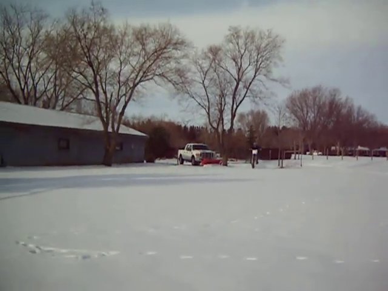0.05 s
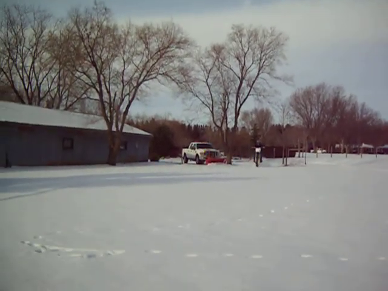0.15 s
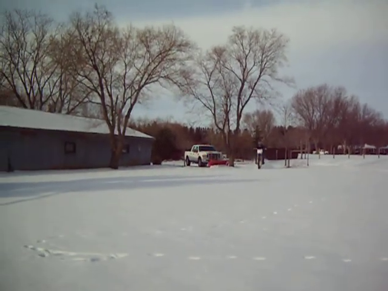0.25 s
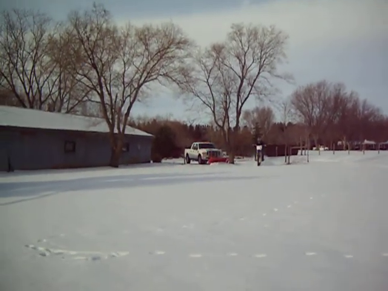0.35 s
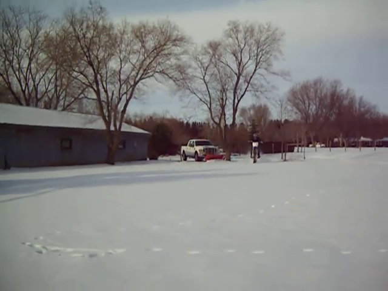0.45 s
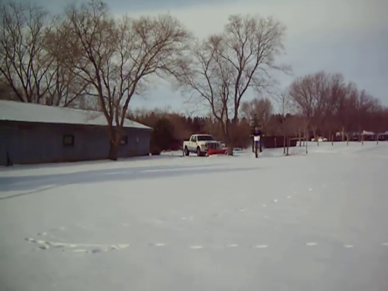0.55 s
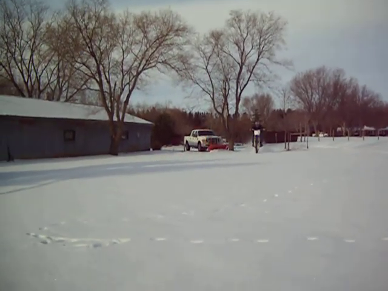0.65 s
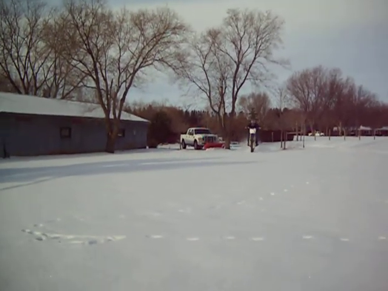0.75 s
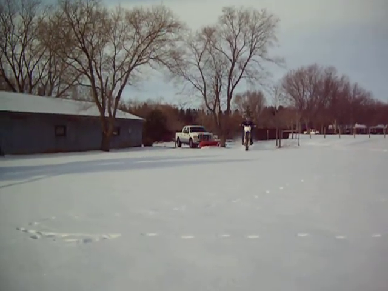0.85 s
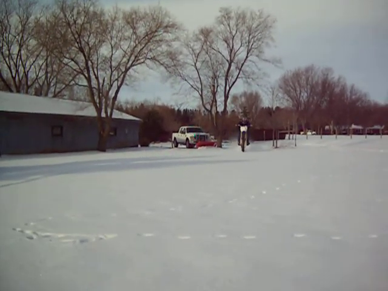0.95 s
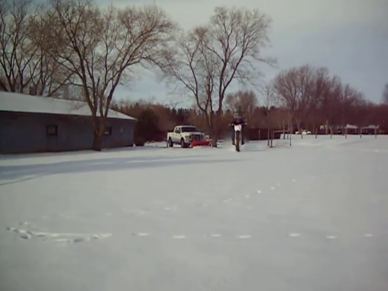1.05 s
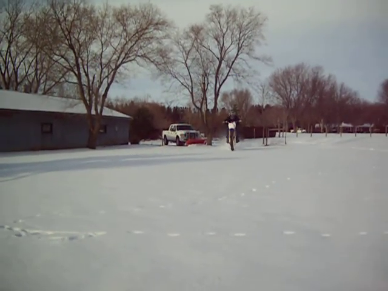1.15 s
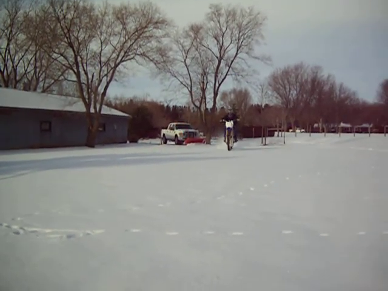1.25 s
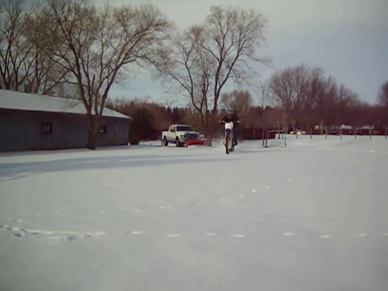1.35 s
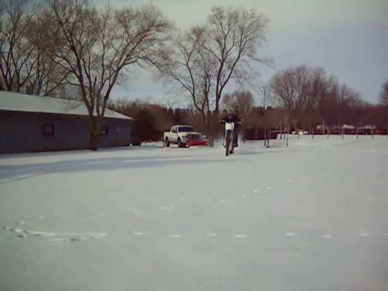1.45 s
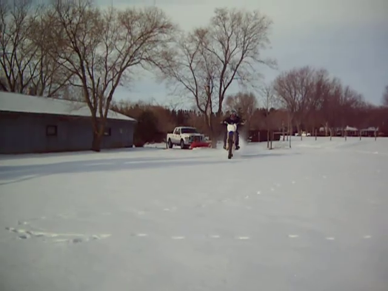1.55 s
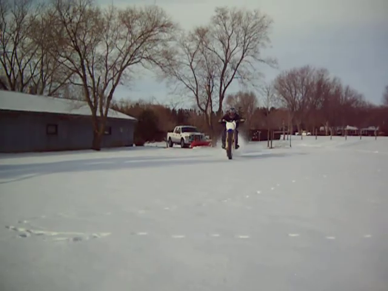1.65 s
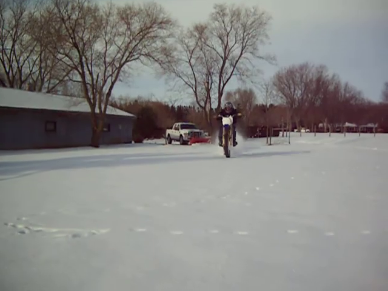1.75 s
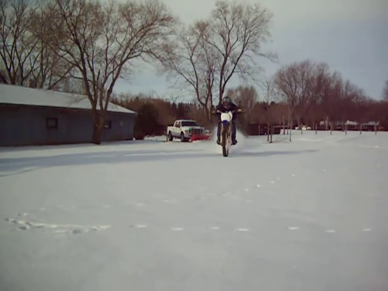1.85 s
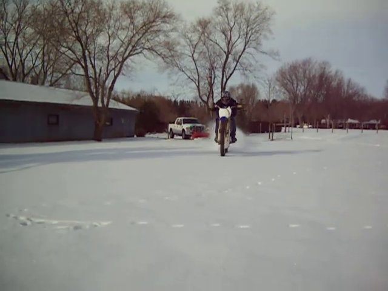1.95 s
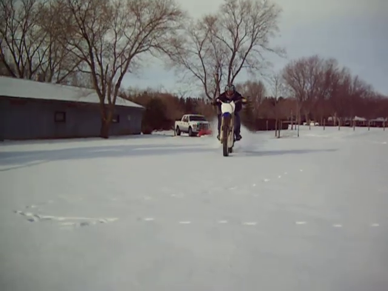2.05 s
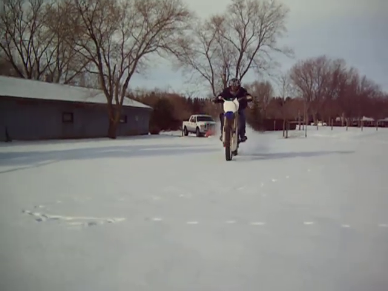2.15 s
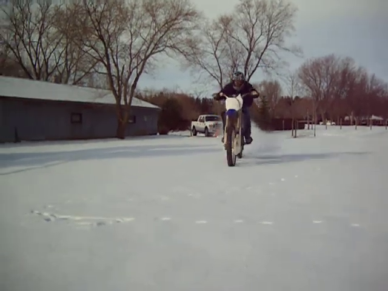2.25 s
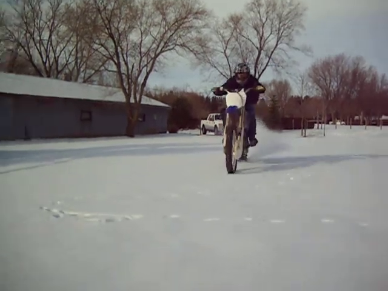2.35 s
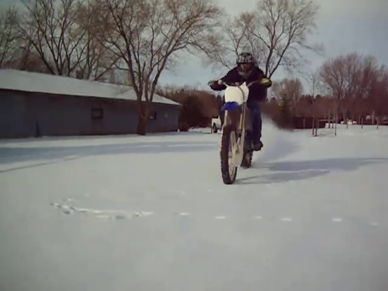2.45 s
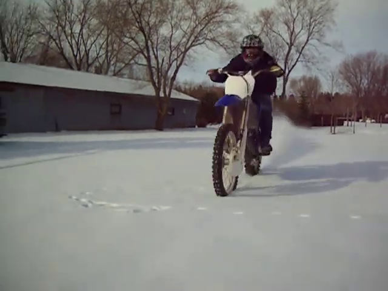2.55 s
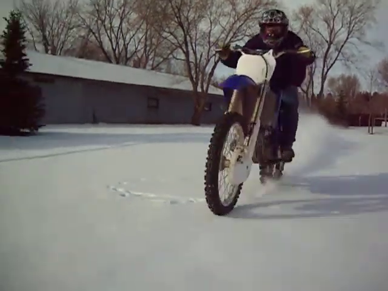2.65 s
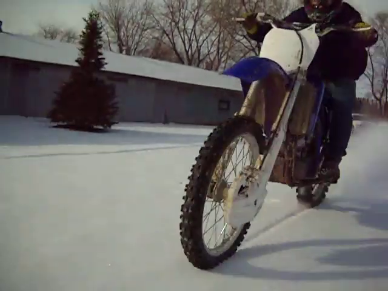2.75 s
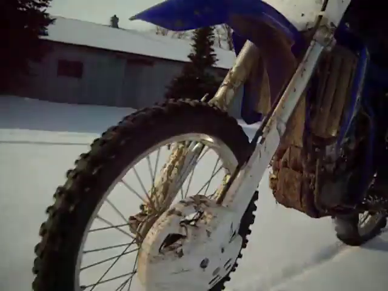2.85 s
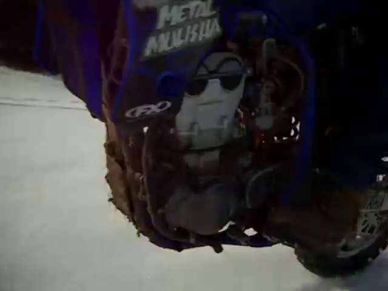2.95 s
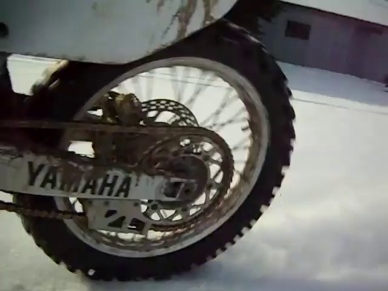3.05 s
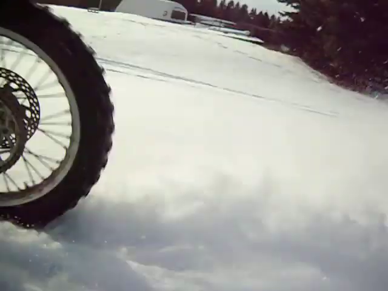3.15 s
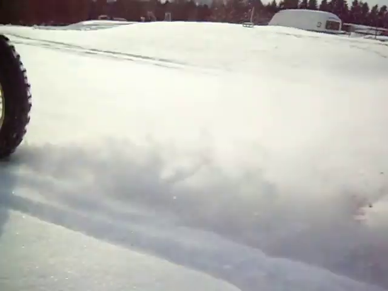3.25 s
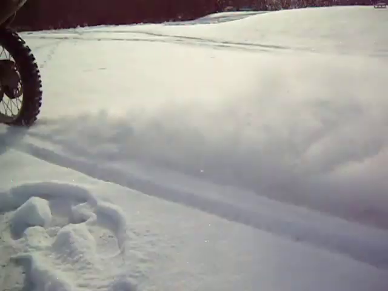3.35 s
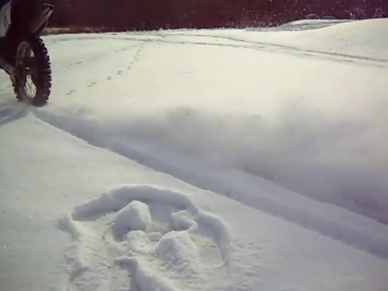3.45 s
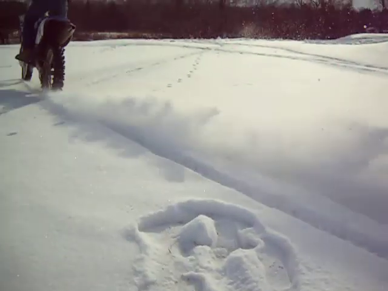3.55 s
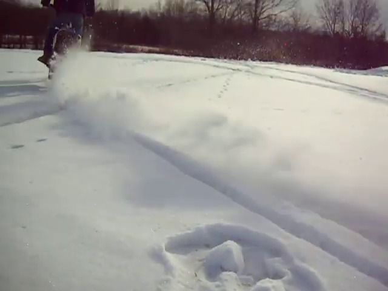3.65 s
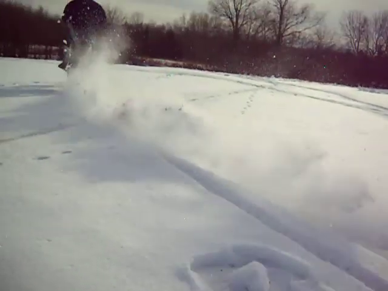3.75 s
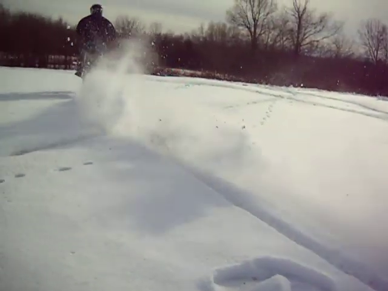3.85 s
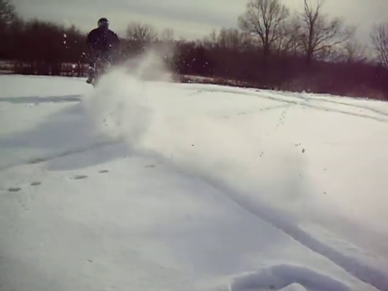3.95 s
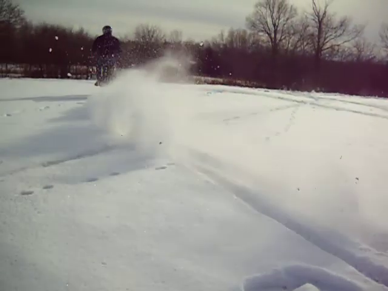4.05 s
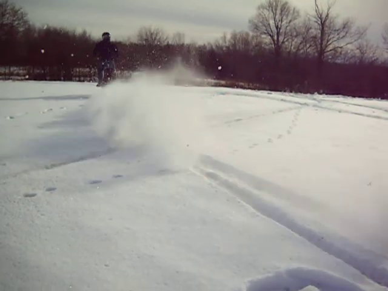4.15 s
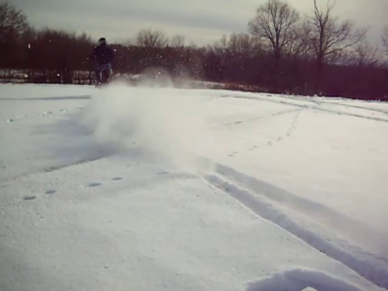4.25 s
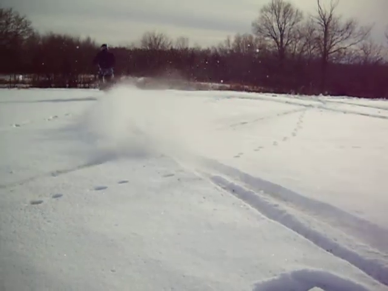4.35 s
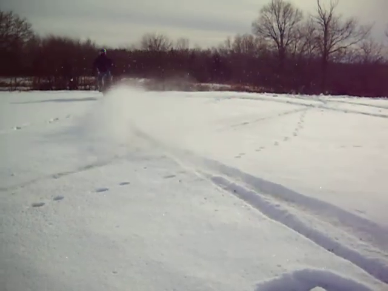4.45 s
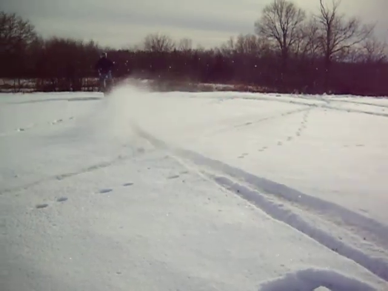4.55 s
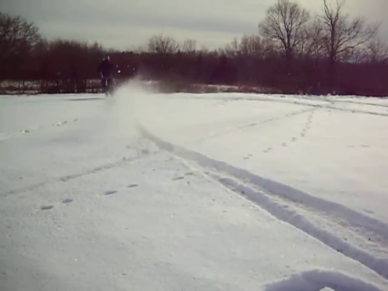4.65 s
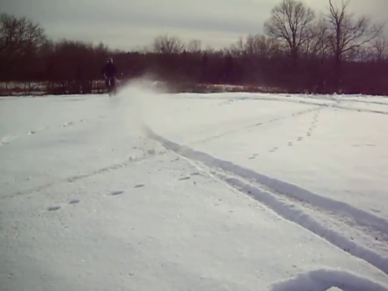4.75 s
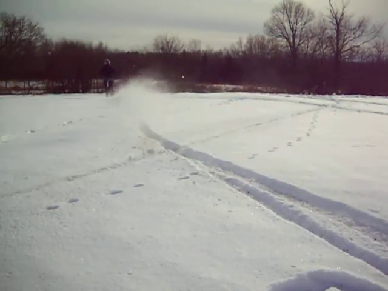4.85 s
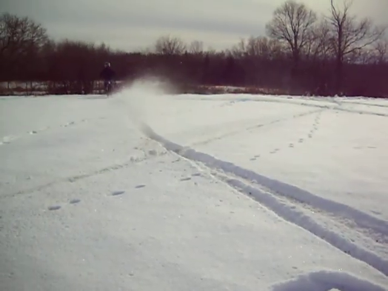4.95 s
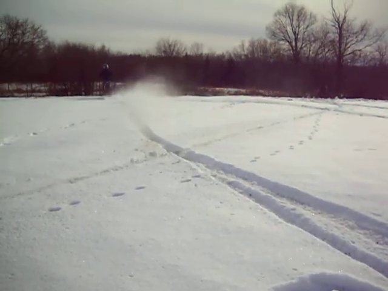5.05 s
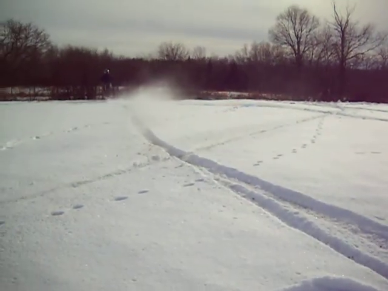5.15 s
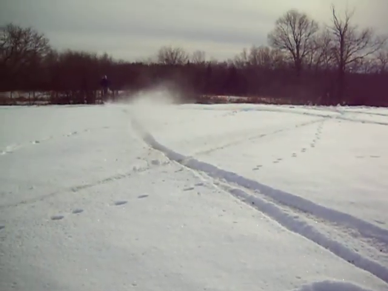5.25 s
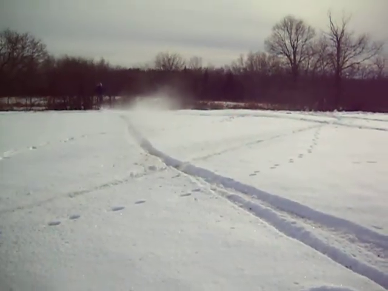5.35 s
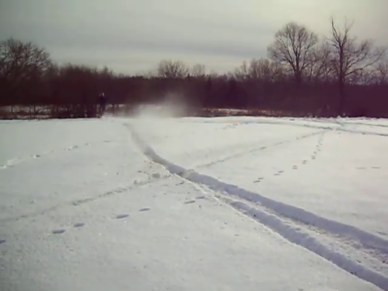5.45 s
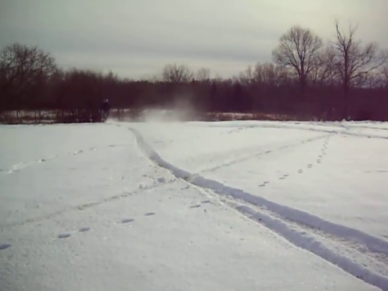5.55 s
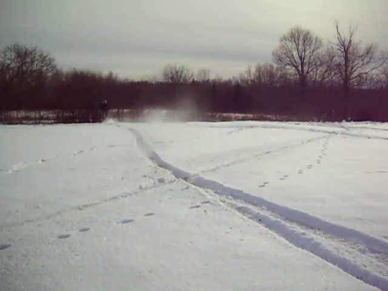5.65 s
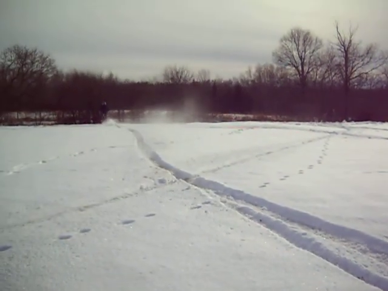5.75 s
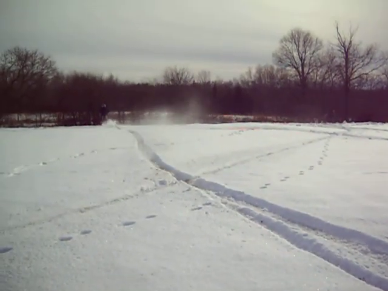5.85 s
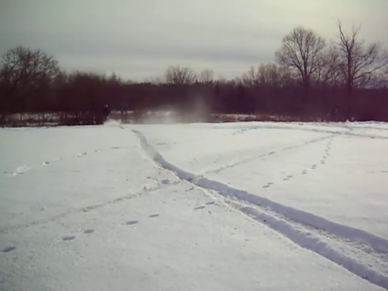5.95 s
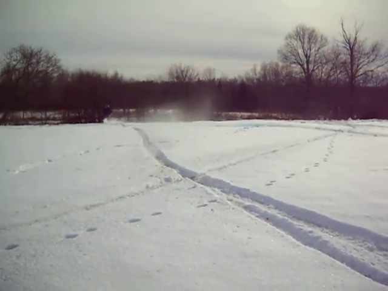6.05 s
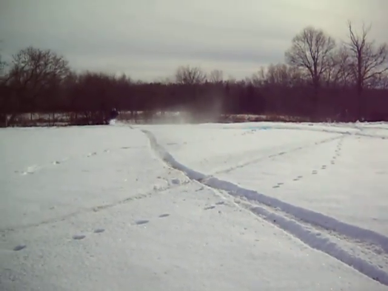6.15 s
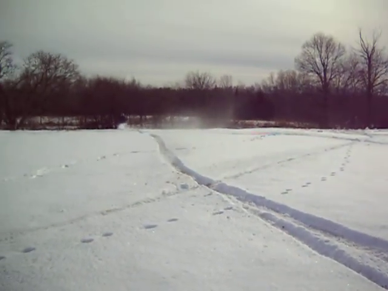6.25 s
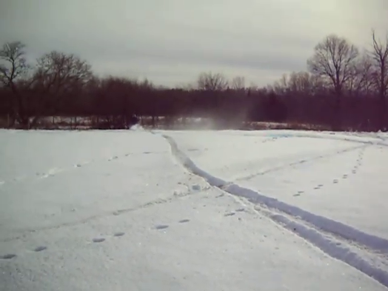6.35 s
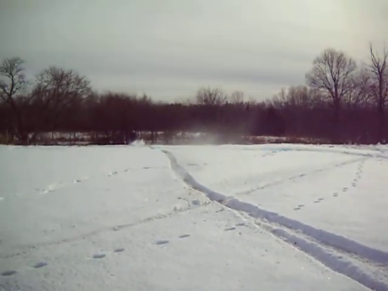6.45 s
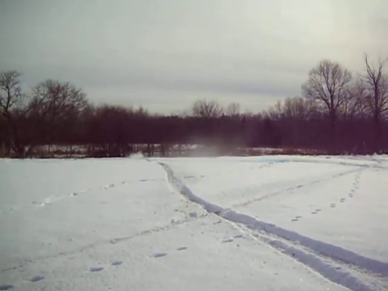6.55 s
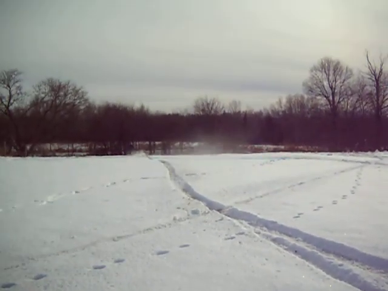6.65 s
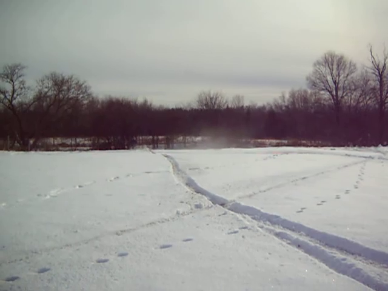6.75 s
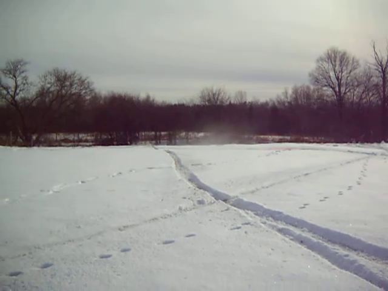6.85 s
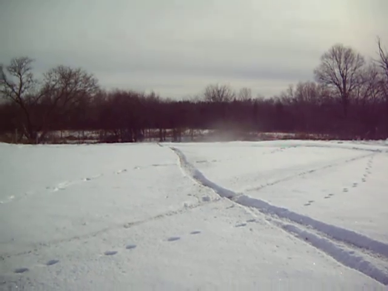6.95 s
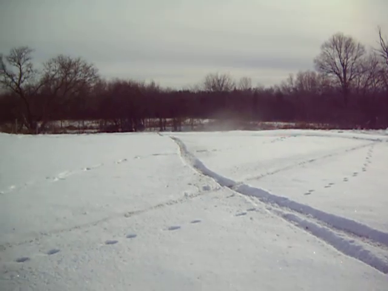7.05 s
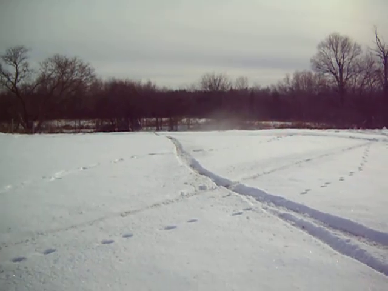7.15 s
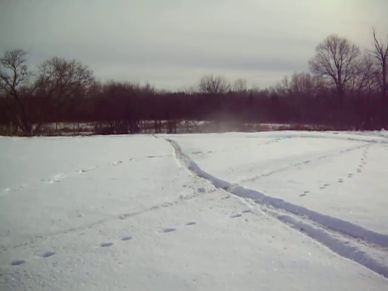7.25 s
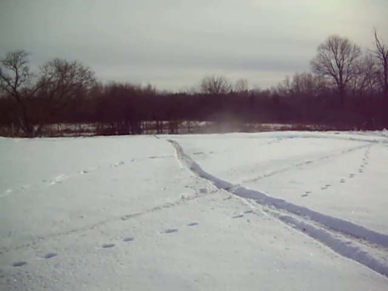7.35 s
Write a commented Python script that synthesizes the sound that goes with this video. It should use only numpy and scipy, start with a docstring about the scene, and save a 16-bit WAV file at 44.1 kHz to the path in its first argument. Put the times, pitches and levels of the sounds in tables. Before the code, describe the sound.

A single-cylinder motorbike charges past at high revs, overloading the microphone, then fades and throttles down to a far, low putter.

```python
"""A four-stroke single-cylinder dirt bike charges over snow at full throttle, passes close, rides away
and shuts off to a far, thudding idle. One firing train drives every engine voice: the intake honks
coming, the exhaust barks going, the silencer booms, the pipe drones, valve gear and chain rasp.
Behind it: buffeting at the microphone, faint air hiss, a hand-held camera case clicking near the end.
The narrow-band input overloads heavily on the pass."""
import sys
import numpy as np
from scipy import signal
from scipy.fft import rfft, irfft, next_fast_len
from scipy.io import wavfile
from scipy.ndimage import uniform_filter1d

SR = 44100
rng = np.random.default_rng(int(sys.argv[2]) if len(sys.argv) > 2 else 0)


def master_out(mix):
    """Clip the mix to full scale and print it as 16-bit PCM to the path in sys.argv[1]."""
    frames = np.transpose(np.atleast_2d(mix))
    ceiling = np.clip(frames, -1, 1)
    pcm = np.round(ceiling * 32767).astype(np.int16)
    wavfile.write(sys.argv[1], SR, pcm)


N = 326781
TIME = np.arange(N) / SR

# on throttle, rear wheel slipping and gripping: time_s, firing_hz
CHARGE_RATE = [(0.0, 99.8), (0.7, 95.3), (0.82, 104.7), (1.13, 98.9), (1.34, 105.9), (1.8, 107.5),
               (1.84, 112.6), (1.9, 109.7), (2.25, 113.7), (2.59, 110.8), (2.65, 113.6), (2.96, 112.4),
               (3.04, 115.5), (3.25, 101.1), (3.49, 100.9), (3.6, 97.7), (3.64, 91.3), (3.68, 96.1),
               (3.79, 91.0), (3.88, 97.0), (4.3, 99.3), (4.34, 103.9), (4.45, 106.3), (4.63, 104.5),
               (4.71, 96.4), (4.75, 101.2), (4.8, 91.3), (4.9, 91.9)]
# down to idle: time_s, firing_hz
COAST_RATE = [(4.94,85),(5.0,71),(5.12,54),(5.2,50),(5.3,53),(5.5,47.3),(5.7,35.3),(5.8,20),(6.08,20.4),(6.17,22.5),(6.53,23.9),(6.68,35),(7.0,36.5),(7.41,34)]
# twist grip moves: time_s, opening (0-1)
GRIP_MOVES = [(4.54, 0.78), (4.775, 0.1), (5.234, 0.73), (5.345, .02), (5.87, 0.24), (6.54, 0.28),
              (6.74, 0.06)]
# skipped firings: time_s
MISFIRES_S = [2.751, 2.896, 3.482, 3.947, 4.484]
# brief swells and dips of the low voices: centre_s, boom_db, drone_db
LOW_SWELLS = [(.58, -4, -2), (.82, 3, -1.5), (1.13, -12, -3), (1.35, 3.5, 4.5), (1.53, -2.5, 2),
              (1.76, 3.5, 4), (2.04, 6.5, 3), (2.15, -3, 3), (2.31, 5.5, -0.5), (2.48, 1, -5),
              (2.851, 2, -4.5), (3.05, -16.5, 4), (3.24, 4.5, -2.5), (5.28, -5, -3.5), (6.63, -2, 5)]
# resonances: centre_hz, width_hz, gain_db
HOT_SILENCER_MODES = [(98.9, 66, -4), (66, 8.3, -19.5)]
COOL_SILENCER_MODES = [(101, 30, -2.5), (74, 45, 5)]
AIRBOX_MODES = [(582.7, 42, 0), (683, 119, 1.5), (781.5, 89, 0.4), (902.5, 82, -1.5), (1021, 89, -7.5)]
EXHAUST_REAR_MODES = [(383, 190, -1.5), (609, 165, 10), (847, 130, 7.5)]
EXHAUST_FLANK_MODES = [(346.5, 77, -2.8), (505, 53.4, 2.6), (671, 81, -1)]
CASE_MODES = [(563, 670, -4.5), (1380, 1400, -0.5), (2400, 470, -23), (3380, 120, -11)]
# level laws: coming_db, coming_loss_db, going_db, going_loss_db, shut_loss_db, slow_loss_db
# (coming and going losses per doubling of distance, slow loss per halving of engine speed)
BOOM_LAW = (1.1, 7.63, 10.63, 6.2, 18, 3.7)
DRONE_LAW = (8.9, 13.27, 18.07, 10.51, 13.8, 3.9)
HONK_BARK_LAW = (16.47, 9.56, 11.4, 7.19, 20.7, 10.6)
RASP_LAW = (0.38, 3.83, 8.44, 8, 6.6, 14.6)
BUFFET_LAW = (-15, 4.5, -6.5, 6.5, 6.5, 2.5)
# spectral shapes: frequency_hz, relative_db
RASP_SPECTRUM = [(250,1),(500,6),(1000,4),(1300,-6.5),(1720,-13.5),(1870,-4),(2020,-3.5),(2150,-4.5),(2380,-5.5),(2600,-7.5),(2900,-6.5),(3500,-7),(3900,-7.5),(5000,-12.5)]
BUFFET_SPECTRUM = [(15,-3.5),(35,-15.5),(54,-1),(75,-10),(130,-5.5),(250,-22.5),(600,-30)]
AIR_SPECTRUM = [(20,6.5),(50,19.5),(120,12.5),(250,10),(600,4),(1500,6),(3500,-11),(5000,-14.5)]
# taps on the camera case: start_s, relative_db
CASE_TAPS = [(6.3, -18), (6.3015, -8), (6.3065, 3.5), (6.589, -24), (6.889, -36)]

PASS_S, SPEED_M_PER_S, CLOSEST_M = 3.04, 10.32, 1.887
CROSSFADE_M, FLANK_M = 2.6, 3.07
RISE_FROM_S, RISE_LOSS_DB_PER_S = 6.34, 6.5
GRIP_MOVE_S, SWELL_WIDTH_S = .055, .06
IDLE_FROM_S, IDLE_BEAT_S = 5.71, 5.912
OVERRUN_BELOW_OPENING, OVERRUN_DRONE_DB = .46, 11.5
WAVER_DB, WAVER_HZ = .99, 7
AIR_DB = -56


def bike():
    """All engine voices on one crank, plus buffeting that follows the pass."""
    firing_hz = np.interp(TIME, *np.transpose(list(CHARGE_RATE) + list(COAST_RATE)))
    doublings, behind, side_on = ride()
    throttle = twist_grip()
    boom_db, drone_db, honk_bark_db, rasp_db, buffet_db = [
        level_db(law, doublings, behind, throttle, firing_hz)
        for law in (BOOM_LAW, DRONE_LAW, HONK_BARK_LAW, RASP_LAW, BUFFET_LAW)]
    boom_swell_db, drone_swell_db = sum(
        np.outer(db, np.exp(-.5 * ((TIME - s) / SWELL_WIDTH_S) ** 2)) for s, *db in LOW_SWELLS)
    before_idle = np.clip(.5 + (IDLE_FROM_S - TIME) / GRIP_MOVE_S, 0, 1)
    overrun = np.clip(1 - throttle / OVERRUN_BELOW_OPENING, 0, 1) * before_idle
    fired = firings(firing_hz, wander=.003)
    # throttle shut: the gas cools, the silencer rings lower
    cooled = np.interp(TIME, [4.9, 5.0], [0, 1])
    hot = silencer(fired, HOT_SILENCER_MODES, drone_hz=191.9, drone_width_hz=42.6, top_hz=436)
    cool = silencer(fired, COOL_SILENCER_MODES, drone_hz=153.4, drone_width_hz=49, top_hz=180.8)
    boom, drone = (1 - cooled) * hot + cooled * cool
    low = from_db(boom_db + boom_swell_db) * boom + afterfire() / 2 ** doublings
    pipe = from_db(drone_db + OVERRUN_DRONE_DB * overrun + drone_swell_db) * drone
    honk = np.sqrt(1 - behind) * intake(fired)
    bark = np.sqrt(behind) * exhaust_bark(fired, side_on, throttle)
    rumble = buffeting(buffet_db)
    clatter = from_db(rasp_db) * rasp(fired, behind * throttle)
    # the bike sinks behind a rise; only the boom bends over it
    shadow = from_db(-RISE_LOSS_DB_PER_S * np.maximum(TIME - RISE_FROM_S, 0))
    return low + rumble + shadow * (pipe + from_db(honk_bark_db) * (honk + bark) + clatter)


def ride():
    """Straight pass: doublings of the closest distance, rear share (0-1), flank share (0-1)."""
    past_m = SPEED_M_PER_S * (TIME - PASS_S)
    distance_m = np.hypot(past_m, CLOSEST_M)
    behind = np.clip(.5 + past_m / CROSSFADE_M, 0, 1)
    return np.log2(distance_m / CLOSEST_M), behind, np.minimum(FLANK_M / distance_m, 1)


def twist_grip():
    """Throttle opening (0-1): wide open, then a quick ramp to each setting."""
    opening = np.ones(N)
    for s, target in GRIP_MOVES:
        opening += (target - opening) * np.clip(.5 + (TIME - s) / GRIP_MOVE_S, 0, 1)
    return np.clip(opening, 0, 1)


def level_db(law, doublings, behind, throttle, firing_hz):
    """Level falls with distance, shut throttle and low revs; it wavers on its way through the air."""
    coming_db, coming_loss_db, going_db, going_loss_db, shut_loss_db, slow_loss_db = law
    front_db = coming_db - coming_loss_db * doublings
    rear_db = going_db - going_loss_db * doublings
    effort_db = -shut_loss_db * (1 - throttle) + slow_loss_db * np.log2(firing_hz / firing_hz[0])
    return (1 - behind) * front_db + behind * rear_db + effort_db + WAVER_DB * drift(WAVER_HZ)


def firings(firing_hz, wander):
    """Sample index of each firing, aligned to the idle beat; crank speed wanders slightly."""
    cycles = np.cumsum(firing_hz * (1 + wander * drift(14))) / SR
    return np.flatnonzero(np.diff(np.floor(cycles - cycles[round(IDLE_BEAT_S * SR)])))


def pulses(fired, spread_db, limp_db, jitter_s, misfire_db):
    """One pulse a firing: strong and weak alternate, with scatter; misfires are weaker."""
    level_scatter, time_scatter = rng.standard_normal((len(fired), 2)).T
    db = spread_db * level_scatter + limp_db * (-1) ** np.arange(len(fired))
    db[[np.argmin(abs(fired / SR - s)) for s in MISFIRES_S]] += misfire_db
    kicks = np.zeros(N)
    kicks[np.clip(fired + (time_scatter * jitter_s * SR).astype(int), 0, N - 1)] = from_db(db)
    return kicks


def gas_burst(kicks, decay_s, rough):
    """Each pulse trails a dying burst of turbulence."""
    envelope = signal.lfilter([1], [1, -np.exp(-1 / (decay_s * SR))], kicks + 1e-18)
    return rms_one(kicks) + rough * rms_one(envelope * rng.standard_normal(N))


def silencer(fired, boom_modes, drone_hz, drone_width_hz, top_hz):
    """Exhaust slugs ring the silencer volume (boom) and, after a trip along it, the pipe (drone)."""
    kicks = pulses(fired, spread_db=.7, limp_db=1.8, jitter_s=.00004, misfire_db=-19.5)
    boom = sum(from_db(db) * resonate(resonate(kicks, hz, width_hz), hz, width_hz)
               for hz, width_hz, db in boom_modes)
    drone = resonate(resonate(kicks, drone_hz, drone_width_hz), drone_hz, drone_width_hz)
    drone = low_pass(delayed(drone, delay_s=.002), top_hz, order=3)
    return np.array([evened(boom), evened(drone)])


def intake(fired):
    """Each gulp of air honks in the airbox."""
    kicks = pulses(fired, spread_db=1.6, limp_db=1.9, jitter_s=.00003, misfire_db=-5)
    gulps = gas_burst(kicks, decay_s=.005, rough=.36)
    honk = high_pass(body(gulps, AIRBOX_MODES), 445, order=2)
    return evened(resonate(honk, hz=514, width_hz=1300))


def exhaust_bark(fired, side_on, throttle):
    """A crack per firing, more soft rush with the throttle shut; darker from the flank."""
    kicks = pulses(fired, spread_db=1.3, limp_db=1.3, jitter_s=.00005, misfire_db=-15.5)
    cracks = delayed(gas_burst(kicks, decay_s=.0024, rough=1), delay_s=.000834)
    gas = (1.2 + throttle) * evened(cracks) + (.62 - .5 * throttle) * rng.standard_normal(N)
    rear = evened(low_pass(high_pass(body(gas, EXHAUST_REAR_MODES), 228), 1750, order=3))
    flank = evened(low_pass(body(gas, EXHAUST_FLANK_MODES), 870, order=3))
    return evened((1 - side_on) * rear + side_on * flank)


def afterfire():
    """The unburnt charge of a skipped firing pops in the pipe."""
    kicks = np.zeros(N)
    kicks[[round(s * SR) for s in MISFIRES_S]] = 1
    pop = resonate(resonate(kicks, hz=182, width_hz=53), hz=194, width_hz=290)
    return from_db(25) * pop / np.abs(pop).max()


def rasp(fired, rear_throttle):
    """Valve gear and gas rush pulse with the firings over the hiss of chain and flung snow."""
    kicks = pulses(fired, spread_db=.65, limp_db=2.03, jitter_s=.00002, misfire_db=-9.5)
    # same metal parts, same rattle every cycle
    rattle = rng.standard_normal(900) * np.exp(-TIME[:900] / .004)
    buzz = rms_one(signal.fftconvolve(kicks, rattle)[:N])
    spit = (.17 + rear_throttle) * rms_one(gas_burst(kicks, decay_s=.006, rough=1.9))
    hiss = 1.1 * rng.standard_normal(N)
    return evened(high_pass(coloured(buzz + hiss + spit, RASP_SPECTRUM), 895, order=2))


def buffeting(gain_db):
    """Air buffets the microphone: a low rumble."""
    return from_db(gain_db) * coloured(rng.standard_normal(N), BUFFET_SPECTRUM)


def camera_clicks():
    """The plastic case snaps under the fingers."""
    taps = np.zeros(N)
    for s, db in CASE_TAPS:
        taps[round(s * SR)] = from_db(db + 17.5)
    return sum(from_db(db) * resonate(taps, hz, width_hz) for hz, width_hz, db in CASE_MODES)


def still_air():
    """Faint, steady air and hiss."""
    return from_db(AIR_DB) * coloured(rng.standard_normal(N), AIR_SPECTRUM)


def from_db(db):
    return 10 ** (np.asarray(db) / 20)


def rms_one(x):
    return x / np.sqrt(np.mean(x ** 2) + 1e-20)


def low_pass(x, hz, order=2):
    return signal.sosfilt(signal.butter(order, hz, fs=SR, output="sos"), x)


def high_pass(x, hz, order=3):
    return signal.sosfilt(signal.butter(order, hz, "high", fs=SR, output="sos"), x)


def delayed(x, delay_s):
    return np.interp(TIME - delay_s, TIME, x, left=0)


def drift(hz):
    """Slow noise below hz; rms 1."""
    return rms_one(low_pass(rng.standard_normal(N), hz))


def coloured(x, spectrum):
    """Shape by a smooth spectrum; rms 1."""
    hz, db = np.transpose(spectrum)
    size = next_fast_len(N)
    bins_hz = np.maximum(np.arange(size // 2 + 1) * SR / size, 1)
    gain = from_db(np.interp(np.log(bins_hz), np.log(hz), db))
    return rms_one(irfft(rfft(x, size) * gain, size)[:N])


def resonate(x, hz, width_hz):
    """One resonance, peak gain 1."""
    radius = np.exp(-np.pi * width_hz / SR)
    feedback = [1, -2 * radius * np.cos(2 * np.pi * hz / SR), radius ** 2]
    return signal.lfilter(np.array([1, 0, -1]) * (1 - radius ** 2) / 2, feedback, x + 1e-18)


def body(x, modes):
    """Parallel resonances, signs alternating."""
    return sum((-1) ** k * from_db(db) * resonate(x, hz, width_hz)
               for k, (hz, width_hz, db) in enumerate(modes))


def evened(x):
    """Hold rms 1 over a few engine cycles."""
    power = uniform_filter1d(uniform_filter1d(x * x, size=4000), size=4000)
    return x / np.sqrt(np.maximum(power, 0) + 1e-6 * np.mean(x * x))


def overload(x, top, hardness):
    """Flat tops, rounded knee."""
    return x / (1 + np.abs(x / top) ** hardness) ** (1 / hardness)


def scene():
    """Bike and case clicks over still air; mono."""
    air = still_air()
    return (bike() + camera_clicks() + air)[None]


def record(dry):
    """The input overloads, the band ends near 4 kHz, the ringing tops overload again."""
    clipped = overload(dry, top=.73, hardness=7)
    narrow = low_pass(high_pass(clipped, 3, order=1), 3750, order=28)
    flattened = overload(narrow, top=.76, hardness=63)
    return signal.sosfilt(signal.ellip(10, .1, 80, 16000, fs=SR, output="sos"), flattened)


dry = scene()
out = record(dry)
master_out(out)
```